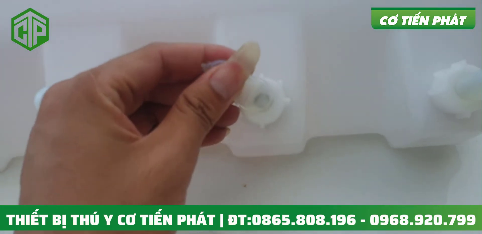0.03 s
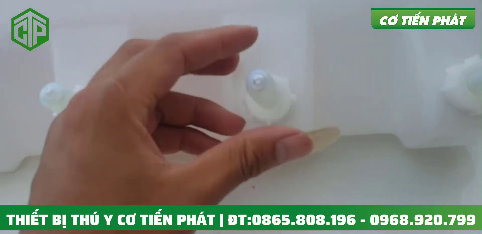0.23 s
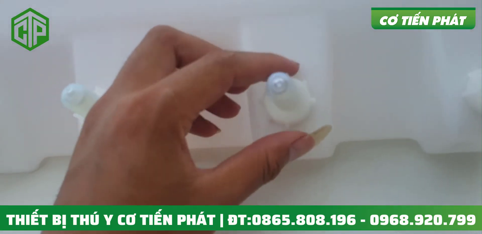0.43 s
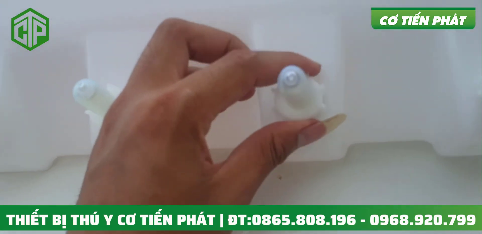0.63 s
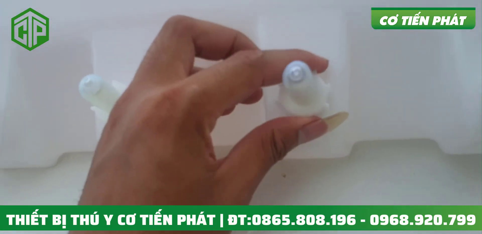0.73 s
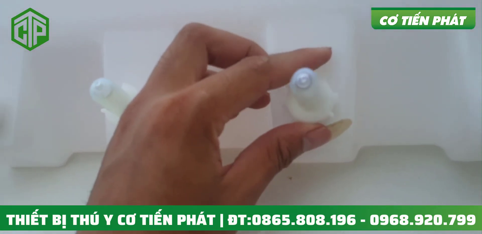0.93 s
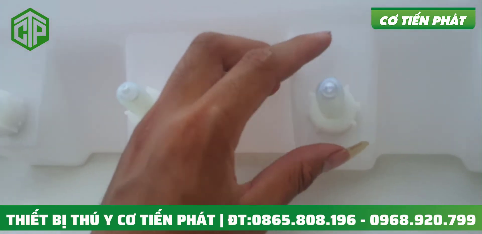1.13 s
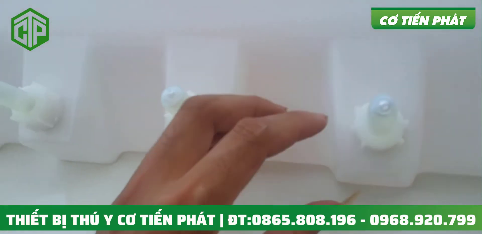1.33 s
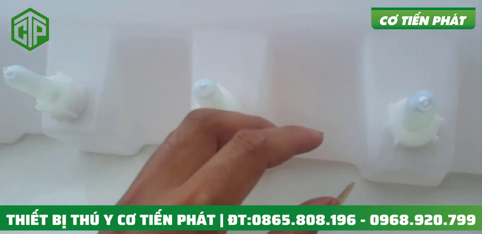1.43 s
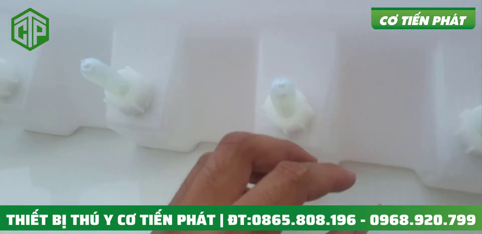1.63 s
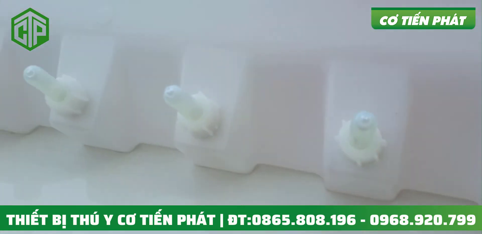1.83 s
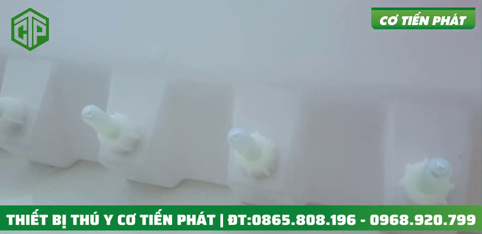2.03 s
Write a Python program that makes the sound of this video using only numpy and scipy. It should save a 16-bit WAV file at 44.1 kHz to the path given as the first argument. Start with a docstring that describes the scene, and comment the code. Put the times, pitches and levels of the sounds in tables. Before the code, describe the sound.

A loud hollow plastic knock, small rubber creaks and rubbing, over low wind rumble outdoors

```python
"""A hollow plastic feeder, close to the microphone: a pinched rubber teat springs back and knocks the tank.
Knocks and bumps ring the tank's modes; the teat creaks and clicks as noise snaps and a ringing cap.
The hand rubs the plastic, heard as swells of grainy coloured noise with small clicks and dull bumps.
Outdoors: low-noise air buffeting, mostly on the left, with a late pop, and sine chirps of far birds with echoes.
Behind them lie a soft noise hiss, a faint wavering sine whine and one brief sizzle."""
import sys
import numpy as np
from scipy import signal
from scipy.fft import rfft, irfft
from scipy.io import wavfile
from scipy.ndimage import uniform_filter1d

SR = 44100
rng = np.random.default_rng(int(sys.argv[2]) if len(sys.argv) > 2 else 0)


def to_wav(s):
    """Save 16-bit WAV."""
    ch = np.atleast_2d(s).T  # columns
    pcm = np.round(np.clip(ch, -1, 1) * 32767)  # PCM
    wavfile.write(sys.argv[1], SR, pcm.astype(np.int16))


N = 92345
T = np.arange(N) / SR


def from_db(db):
    """Decibels to gain."""
    return 10 ** (np.asarray(db) / 20)


def rms_one(x):
    """Scale to unit rms, over both channels together."""
    return x / np.sqrt(np.mean(x ** 2) + 1e-20)


def pan(db):
    """Left and right gains for a left-minus-right level difference."""
    return from_db(np.array([[.5], [-.5]]) * db)


def at_hz(points, hz):
    """Read a table on a log-frequency axis."""
    table_hz, value = np.transpose(points)
    return np.interp(np.log(hz + 1), np.log(table_hz), value)


def level_curve(points):
    """Gain over time, from a table of start_s and level_db joined by straight lines in dB."""
    return from_db(np.interp(T, *np.transpose(points)))


def drift(rate_hz):
    """Random wander with unit rms, weaker above the given rate."""
    hz = np.fft.rfftfreq(N, 1 / SR)
    return rms_one(irfft(rfft(rng.standard_normal(N)) / (1 + (hz / rate_hz) ** 2), N))


def phase_of(hz):
    """Running phase of a tone whose frequency varies."""
    return 2 * np.pi * np.cumsum(hz) / SR


def white_pair(alike):
    """Two white noises with a given correlation."""
    mid, side = rng.standard_normal((2, N))
    return rms_one(np.sqrt(1 + alike) * mid + np.sqrt(1 - alike) * side * [[1], [-1]])


def grains(alike, grain):
    """Stereo friction: a dense run of tiny slips of uneven size."""
    size = np.exp(grain * drift(1350))
    return rms_one(white_pair(alike) * size)


def colour(x, spectrum, gains=1):
    """Give a noise a spectrum; unit rms."""
    shape = from_db(at_hz(spectrum, np.fft.rfftfreq(N, 1 / SR)))
    return rms_one(irfft(rfft(x) * shape * gains, N))


def ring(clicks, hz, t60):
    """A click excites a decaying sine, which falls 60 dB in t60 seconds."""
    r = from_db(-60 / (t60 * SR))
    w = 2 * np.pi * hz / SR
    return signal.lfilter([0, np.sin(w)], [1, -2 * r * np.cos(w), r * r], clicks + 1e-18)


def burst(start, hold, t60):
    """Sudden start, hold, exponential decay."""
    return (T >= start) * np.exp(-np.log(1000) * np.maximum(T - start - hold, 0) / t60)


def build_up(start, rise):
    """An exponential approach to full level."""
    return 1 - np.exp(-np.maximum(T - start, 0) / rise)


def swell(peak, rise, fall):
    """A smooth bell-shaped rise and fall."""
    return np.exp(-((T - peak) / np.where(T < peak, rise, fall)) ** 2 / 2)


# blows on the tank; at 1.438 and 1.469 dull low bumps of a rub; last, at 2.003, a pop of wind on the left
# relative levels: start_s [s], ring_db, contact_db, rattle_db [dB], left_minus_right_db [dB]
THUMPS = [(0.206, -27, -45, -15, 5.5), (0.234, -28.5, -37, -36, 3), (0.259, -21.5, -21.5, -11.5, 3),
          (0.5556, -0.5, 1.5, 6.5, 5), (0.593, -16, -17.5, -28, -1.5), (0.733, -19.5, -32, -16, 4.5),
          (1.401, -28, -16.5, -12.5, 10), (1.438, -43.5, -26, -37, 24), (1.469, -31.5, -45, -25, 2),
          (2.003, -26, -31, -26, 16)]
# modes of the hollow tank: pitch_hz [Hz], relative level_db [dB], t60_s [s]
TANK_MODES = [(123, -36, 0.26), (151.1, -25.5, 0.39), (205.7, -9, 0.071), (287.5, -8.5, 0.09),
              (392.2, -28.5, 0.2), (550, -27, 0.12), (726.6, -22.5, 0.12), (762, -24, 0.02),
              (868, -24.5, 0.043), (937.6, -26.5, 0.079)]
# spectrum of the hard contact: pitch_hz [Hz], relative level_db [dB per Hz]
CONTACT = [(300, -2), (550, 3.5), (720, 12.5), (930, 5.5), (1300, -11.5), (2000, -14.5), (2750, -1),
           (3300, -23), (5500, -19), (8000, -44), (14000, -60)]
# spectrum of the dull rattle: pitch_hz [Hz], relative level_db [dB per Hz]
RATTLE = [(30, -4), (55, -5), (130, 12.5), (280, 1), (420, -4), (900, -14), (1500, -17.5), (2600, -26.5),
          (3400, -33), (6000, -36), (14000, -77)]
CONTACT_DB, CONTACT_T60_S = -19, 0.052  # gain added to contact_db
RATTLE_DB, RATTLE_T60_S, RATTLE_RISE_S = -28.5, 0.33, .012  # gain added to rattle_db
SOFTNESS_S = .00008  # each push is spread over this time, as by soft rubber
MODE_SPREAD_DB = 0.5  # random spread of each mode from thump to thump


def thumps():
    """Blows, rub bumps and the wind pop: a push into the tank's modes, a short contact, a rattle that builds up."""
    contact = colour(white_pair(alike=0.25), CONTACT) * pan(db=4.0)
    rattle = colour(white_pair(alike=0.94), RATTLE)
    out = 0
    for s, ring_db, contact_db, rattle_db, pan_db in THUMPS:
        push = swell(s + SOFTNESS_S, SOFTNESS_S, SOFTNESS_S)
        click = from_db(ring_db) * push / push.sum()
        tank = 0
        for k, (hz, db, t60) in enumerate(TANK_MODES):
            gain = from_db(db + MODE_SPREAD_DB * rng.standard_normal())
            tank = tank + (-1) ** k * gain * ring(click, hz, t60)  # neighbours in opposite polarity
        rattle_shape = burst(s, 0, RATTLE_T60_S) * build_up(s, RATTLE_RISE_S)
        dull = from_db(rattle_db + RATTLE_DB) * rattle_shape * rattle
        hard = from_db(contact_db + CONTACT_DB) * burst(s, 0, CONTACT_T60_S) * contact
        out = out + (tank + dull) * pan(pan_db) + hard
    return out


# creaks and clicks of the teat, and small clicks within the rub near 1.4 s (1.3953, 1.4385, 1.447):
# start_s [s], snap_db, cap_db [dB], slip_s [s], snap_t60_s [s]
CLICKS = [(0.2, -45.5, -73, 0.0017, 0.011), (0.26, -48.5, -65, 0.0019, 0.035),
          (0.4129, -35.5, -29, 0.0085, 0.023), (0.4497, -26.5, -37, 0.00088, 0.025),
          (0.617, -48.5, -45, 0.0016, 0.09), (1.3953, -44, -64, 0.0023, 0.025),
          (1.4385, -48, -46, .001, 0.031), (1.447, -47, -50, 0.0021, 0.014)]
# the cap rings while the rubber slips: pitch_hz [Hz], relative level_db [dB]
CAP_MODES = [(720, -4.5), (1725, 4.5), (2330, 0.5), (2560, 1.5), (2690, -7), (4300, 0.5), (6300, -22),
             (7000, -18)]
# spectrum of the snap: pitch_hz [Hz], relative level_db [dB per Hz]
SNAP = [(500, -20), (1200, 0), (2000, -14), (2600, 5), (3200, -11), (3900, -5.5), (4700, -2.5), (5300, 0),
        (5900, -2.5), (6400, 2), (7200, -5), (8000, -16), (10000, -13.5), (14000, -40)]
CAP_RISE_S, CAP_T60_S = 0.002, 0.05
CAP_WAVER = .02  # rms waver of each pitch, as a fraction
CAP_ROUGH = 0.4  # the slipping rubber shakes the cap unevenly: rms depth of the flutter


def creaks_and_clicks():
    """Slipping rubber snaps and drives the finger-damped cap; small clicks of a rub sound the same way."""
    snap = colour(grains(alike=0.035, grain=0.54), SNAP)
    cap = 0
    for hz, db in CAP_MODES:
        phase = phase_of(hz * (1 + CAP_WAVER * drift(337)))
        cap = cap + from_db(db) * np.sin(phase + rng.normal(0, 1.0, (2, 1)))  # own phase on each side
    cap = rms_one(rms_one(cap) * (1 + CAP_ROUGH * drift(700)))
    out = 0
    for s, snap_db, cap_db, slip_s, t60 in CLICKS:
        cap_shape = burst(s, slip_s, CAP_T60_S) * build_up(s, CAP_RISE_S)
        out = out + from_db(snap_db) * burst(s, slip_s, t60) * snap * pan(db=2.0)
        out = out + from_db(cap_db) * cap_shape * cap * pan(db=-2.5)
    return out


# skin rubbing on plastic, and the scuffing noise of the teat's creak at 0.417:
# peak_s [s], rise_s [s], fall_s [s], body_db, scuff_db, hiss_db [dB]
SCRAPES = [(0.072, 0.0066, 0.0044, -70, -49.5, -77), (0.145, 0.013, 0.01, -48.5, -74, -73),
           (0.26, 0.13, 0.089, -49, -63, -61), (0.417, 0.0048, 0.027, -37, -43.5, -49.5),
           (0.487, .014, 0.0095, -56, -51, -41), (0.48, 0.026, 0.084, -49, -48.5, -53.5),
           (0.70, 0.064, 0.062, -42, -55.5, -58.5), (1.069, 0.027, 0.025, -47.5, -52.5, -50.5),
           (1.161, 0.0097, 0.0085, -44.5, -50.5, -56), (1.405, 0.014, 0.013, -53, -50, -44.5),
           (1.439, 0.01, .011, -52, -46, -42), (1.47, 0.016, 0.019, -63, -53, -55.5),
           (1.975, .02, 0.028, -65, -50.5, -59), (2.07, 0.073, 0.042, -62, -71, -50.5)]
# spectrum of the hollow body: pitch_hz [Hz], relative level_db [dB per Hz]
BODY = [(80, -4.5), (150, -2.5), (205, -10.5), (290, -0.5), (370, -5), (450, -13.5), (600, -15),
        (1200, -64)]
# spectrum of the scuff: pitch_hz [Hz], relative level_db [dB per Hz]
SCUFF = [(250, 9), (450, 5), (740, 10.5), (1050, 6.5), (1700, -16.5), (2050, -22.5), (2650, 6), (3300, -23),
         (8000, -56)]
# spectrum of the fine hiss: pitch_hz [Hz], relative level_db [dB per Hz]
HISS = [(2000, -2), (3400, -11.5), (4700, 0.5), (5800, -3), (7000, -4.5), (8200, -10.5), (11000, -13.5),
        (15000, -31)]
FRICTION_GRAIN = 0.4  # unevenness of the tiny slips
FRICTION_PANS_DB = (1.5, 4, -2)  # body, scuff, hiss: left minus right


def friction():
    """Skin on plastic, and the scuff of one creak: each swell has a hollow body, a scuff and a fine hiss."""
    out = 0
    for k, (spectrum, alike) in enumerate([(BODY, .95), (SCUFF, .4), (HISS, .1)]):
        # overlapping swells add in power
        power = sum((from_db(levels[k]) * swell(s, rise, fall)) ** 2 for s, rise, fall, *levels in SCRAPES)
        noise = colour(grains(alike, FRICTION_GRAIN), spectrum)
        out = out + np.sqrt(power) * noise * pan(FRICTION_PANS_DB[k])
    return out


# air on the microphone: start_s [s], left_db [dB], right_db [dB]
WIND = [(0, -46, -46), (0.05, -65, -68), (0.081, -61, -36.5), (0.128, -50, -50), (0.3, -41, -57),
        (0.52, -44.5, -56), (0.6, -31, -34.5), (0.72, -42.5, -44.5), (0.9, -47.5, -55), (1.2, -51.5, -65),
        (1.229, -29, -58), (1.3, -48, -62), (1.379, -35, -44), (1.43, -46, -49), (1.47, -44.5, -53),
        (1.54, -55, -56), (1.7, -36, -52), (1.802, -43.5, -63), (1.824, -25.5, -58), (1.88, -29.5, -62),
        (1.95, -20, -50), (1.99, -20.5, -39), (2.03, -33, -52), (2.09, -32, -44)]
# spectrum of the buffeting: pitch_hz [Hz], relative level_db [dB per Hz]
WIND_COLOUR = [(15, -50), (30, -22), (54, 6), (80, -4.5), (120, -8), (200, -25.5), (330, -35), (500, -59.5),
               (1000, -51), (3000, -77)]


def wind():
    """Air buffets the microphone: low rumble with its own strength on each side."""
    s, left_db, right_db = np.transpose(WIND)
    rumble = colour(white_pair(alike=0.94), WIND_COLOUR)
    # even out its chance swells over 59 ms, so that the table sets the gusts
    power = uniform_filter1d(rumble ** 2, size=2600, axis=1, mode="wrap")
    rumble = rumble / np.sqrt(power + 1e-9)
    return rumble * from_db([np.interp(T, s, left_db), np.interp(T, s, right_db)])


# far chirps: start_s [s], length_s [s], first_hz, last_hz [Hz], relative level_db [dB], left_minus_right_db [dB]
CHIRPS = [(0.039, 0.083, 6740, 6400, -62.5, 12), (1.043, 0.039, 5320, 4390, -47.5, -10.5),
          (1.261, 0.037, 5340, 4400, -49, -15), (1.302, 0.0692, 4700, 4170, -52.5, -1),
          (1.632, 0.095, 3868, 3860, -57, -6), (1.76, .06, 3875, 3865, -60, 0)]
CHIRP_ROUGH = .22  # rms pitch waver, as a fraction of the sweep
DIRECT_DB, ECHO_DB, ECHO_T60_S = -7, -3, 0.42


def birds():
    """Falling chirps, rougher the wider they sweep, blurred by outdoor echoes."""
    direct = 0
    for s, length, first_hz, last_hz, db, pan_db in CHIRPS:
        part = np.clip((T - s) / length, 0, 1)
        glide_hz = first_hz + (last_hz - first_hz) * part
        hz = glide_hz + CHIRP_ROUGH * (first_hz - last_hz) * drift(376)
        chirp = np.sin(np.pi * part) * np.sqrt(2) * np.sin(phase_of(hz))
        direct = direct + from_db(db) * pan(pan_db) * chirp
    echoes = rms_one(white_pair(alike=0) * burst(0, 0, ECHO_T60_S)) / np.sqrt(N)
    echoed = signal.fftconvolve(direct, echoes, axes=1)[:, :N]
    return from_db(DIRECT_DB) * direct + from_db(ECHO_DB) * echoed


# spectrum of the outdoor hiss: pitch_hz [Hz], relative level_db [dB per Hz]
AIR = [(60, 2.5), (150, 0), (205, -15), (310, -3), (480, -7.5), (720, -1), (1000, -8.5), (1350, -16),
       (1680, -7), (2000, -19.5), (2750, -9), (3200, -25), (3700, -25), (4500, -10), (6000, -25),
       (7400, -21.5), (8800, -16), (11000, -28.5), (15000, -35)]
# the hiss is louder on the left in the bass, on the right in the treble: pitch_hz [Hz], left_minus_right_db [dB]
AIR_BALANCE = [(150, 10.5), (700, 4.5), (1200, 1.5), (2500, -10.5), (5000, -6.5), (9000, -5.5), (13000, -1)]
# level of the hiss: start_s [s], level_db [dB]
AIR_LEVEL = [(0, -52), (0.35, -50.5), (0.75, -50), (0.95, -52), (1.2, -50), (1.6, -51), (1.9, -52.5),
             (2.09, -47.5)]
# level of the faint whine: start_s [s], level_db [dB]
WHINE = [(0, -82), (0.5, -56.5), (0.92, -90), (1.03, -54.5), (1.18, -57.5), (1.3, -67.5), (1.58, -59),
         (1.8, -71), (2.09, -59)]
WHINE_HZ, WHINE_WAVER = 723.4, 0.0086  # centre; rms waver as a fraction
# spectrum of the thin sizzle: pitch_hz [Hz], relative level_db [dB per Hz]
SIZZLE_COLOUR = [(4000, -13), (7000, -2.5), (9500, -3), (13000, -7.5), (15300, -8.5)]
SIZZLE_PEAK_S, SIZZLE_WIDTH_S, SIZZLE_DB = 1.799, 0.048, -56


def background():
    """Outdoor noise hiss with a slowly moving level, a faint wavering whine and a brief thin sizzle."""
    balance = pan(at_hz(AIR_BALANCE, np.fft.rfftfreq(N, 1 / SR)))
    air = level_curve(AIR_LEVEL) * colour(white_pair(alike=0.05), AIR, balance)
    whine_hz = WHINE_HZ * (1 + WHINE_WAVER * drift(29))
    whine = level_curve(WHINE) * np.sqrt(2) * np.sin(phase_of(whine_hz))
    sizzle_shape = from_db(SIZZLE_DB) * swell(SIZZLE_PEAK_S, SIZZLE_WIDTH_S, SIZZLE_WIDTH_S)
    sizzle = sizzle_shape * colour(white_pair(alike=.1), SIZZLE_COLOUR)
    return air + whine * pan(db=5.5) + sizzle * pan(db=1.5)


PORT_LAG_S = .00024  # thumps and friction reach the right port later than the left


def across_ports(x):
    """Delay the right channel by the path between the microphone's ports."""
    return np.array([x[0], np.interp(T - PORT_LAG_S, T, x[1], left=0)])


def scene():
    """The feeder in front, the outdoors around it."""
    return across_ports(thumps() + friction()) + creaks_and_clicks() + wind() + birds() + background()


def record(dry):
    """The top is cut steeply: 70 dB down from 15.9 kHz up."""
    return signal.sosfilt(signal.cheby2(14, 70, 15900, fs=SR, output="sos"), dry)


dry = scene()
out = record(dry)
to_wav(out)
```